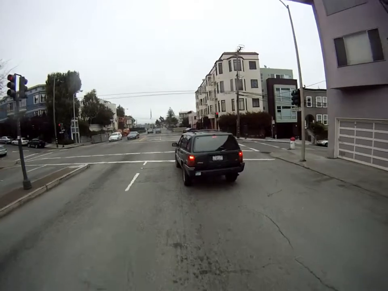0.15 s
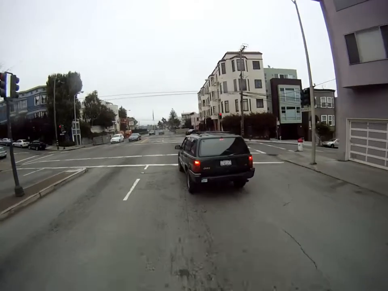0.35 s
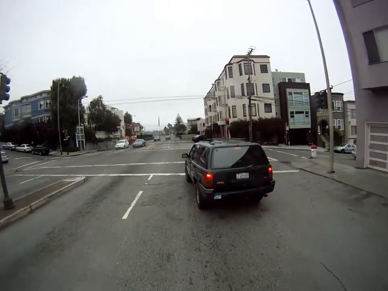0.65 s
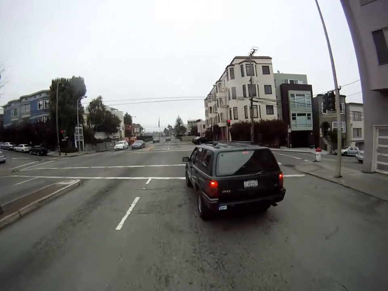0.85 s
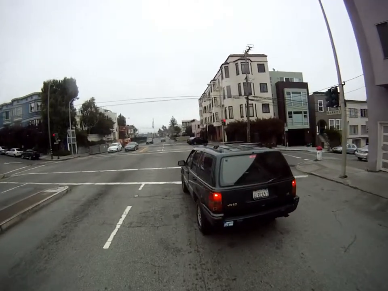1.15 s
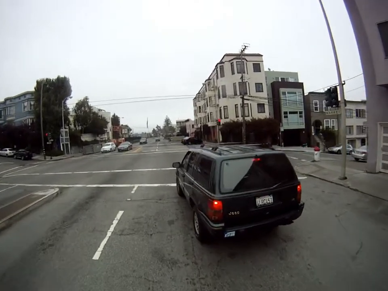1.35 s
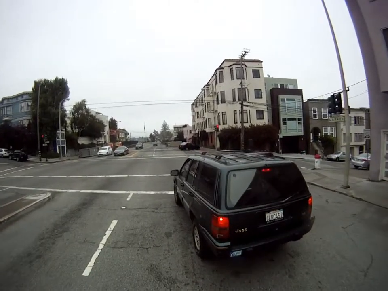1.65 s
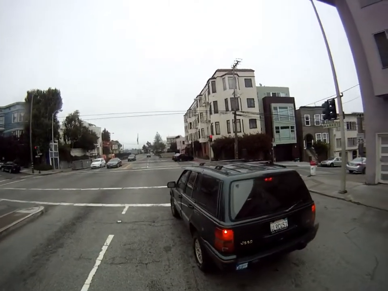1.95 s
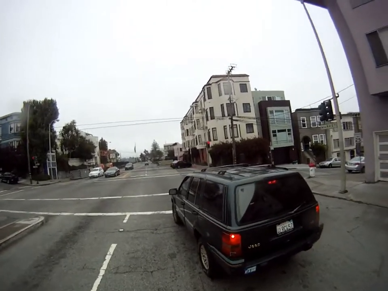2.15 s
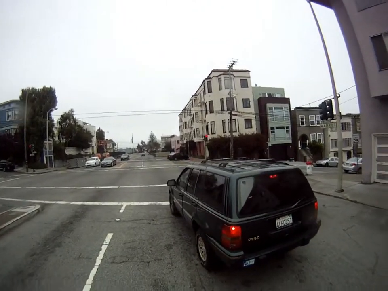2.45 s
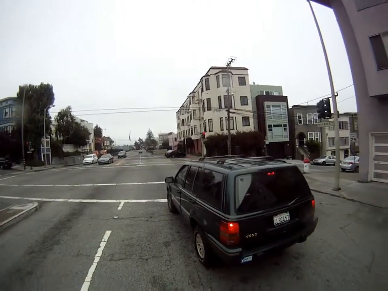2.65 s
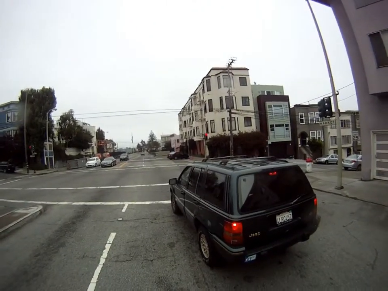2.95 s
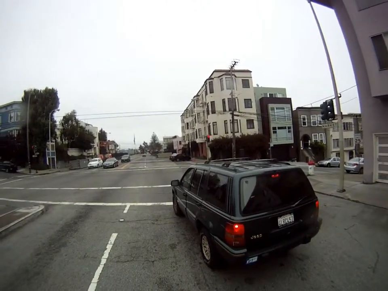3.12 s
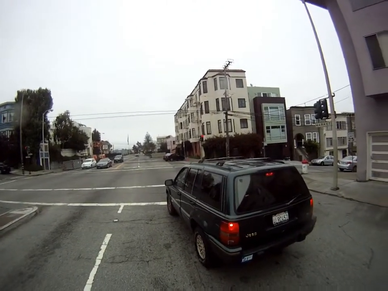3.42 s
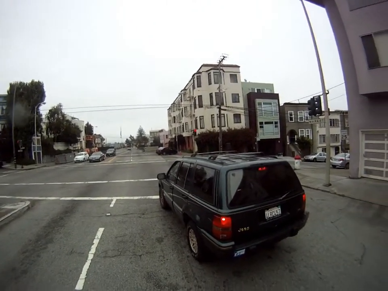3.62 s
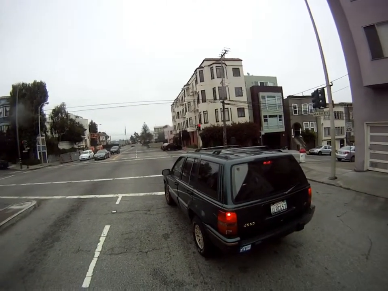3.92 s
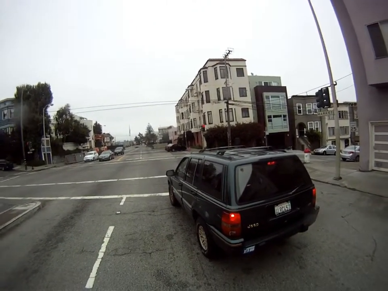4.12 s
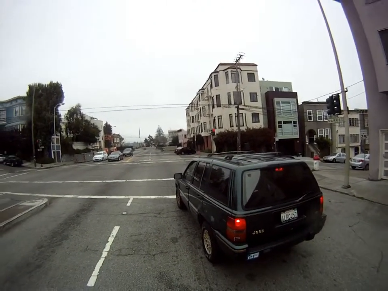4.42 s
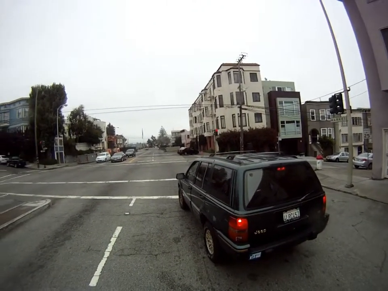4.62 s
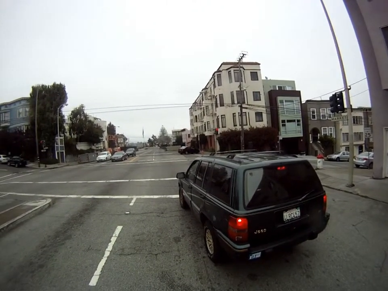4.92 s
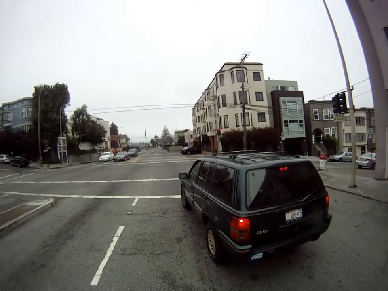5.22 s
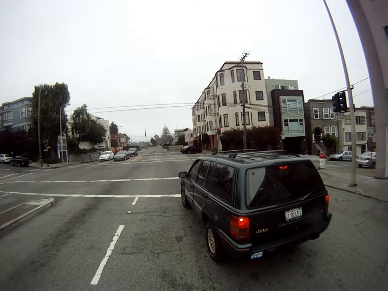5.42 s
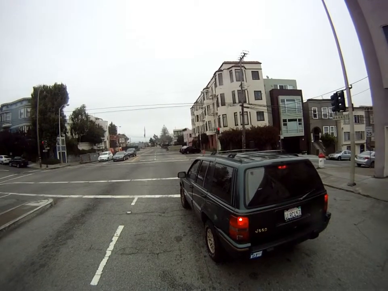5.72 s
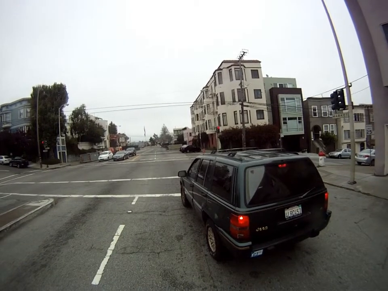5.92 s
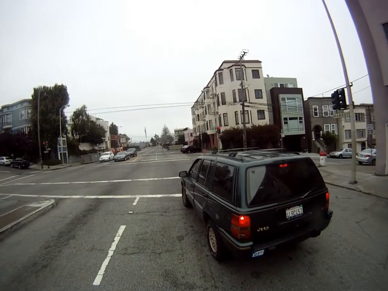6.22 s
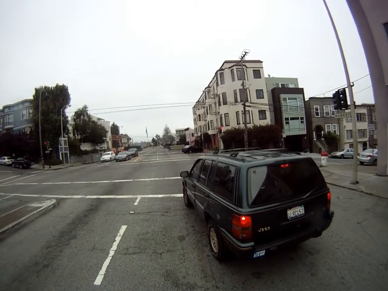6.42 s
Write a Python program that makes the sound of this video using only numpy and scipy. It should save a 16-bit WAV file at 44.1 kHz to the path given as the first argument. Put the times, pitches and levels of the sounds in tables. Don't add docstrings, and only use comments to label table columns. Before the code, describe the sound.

A bicycle brake squeals in a steady, wavering high note for under two seconds, then stops, leaving soft bumps, ticks and distant city traffic.

```python
import sys
import numpy as np
from scipy import signal
from scipy.fft import rfft, irfft, next_fast_len
from scipy.io import wavfile
from scipy.ndimage import uniform_filter1d, map_coordinates

SR = 44100
rng = np.random.default_rng(int(sys.argv[2]) if len(sys.argv) > 2 else 0)


def how_loud(loudness_db):
    steps = np.asarray(loudness_db, float) / 20
    return 10 ** steps


def wrap_up_sound(samples):
    columns = np.atleast_2d(samples).T
    tamed = np.clip(columns, -1, 1)
    steps = np.round(tamed * 32767).astype(np.int16)
    wavfile.write(sys.argv[1], SR, steps)


N = 289692
T = np.arange(N) / SR


def unit(x):
    return x / np.sqrt(np.mean(x ** 2) + 1e-20)


def along(points, hz):
    f, v = np.transpose(points)
    return np.interp(np.log(hz + 1), np.log(f + 1), v)


def swells(rows):
    return sum(size * np.exp(-((T - s) / width) ** 2) for s, size, width in rows)


def wobble(rate):
    knots = rng.standard_normal(int(N * 400 / SR) + 4)
    return map_coordinates(knots, [np.arange(N) * min(rate, 400) / SR])


def filtered(x, response):
    m = next_fast_len(N + SR // 2)
    return irfft(rfft(x, m) * response(np.fft.rfftfreq(m, 1 / SR)), m)[..., :N]


def modes(table):
    return lambda f: sum(how_loud(db) * 1j * f * w / (c * c - f * f + 1j * f * w) for c, w, db in table)


def rush(response, patchy_db):
    z = signal.stft(rng.standard_normal(N), nperseg=512)[2]
    field = uniform_filter1d(rng.standard_normal(z.shape), 6, 0)
    field = uniform_filter1d(field, 12, 1)
    noise = signal.istft(z * how_loud(patchy_db * unit(field)), nperseg=512)[1][:N]
    return unit(filtered(noise, response))


def add(track, s, sound):
    part = track[round(s * SR):][:len(sound)]
    part += sound[:len(part)]


def ring(hz, t60, attack):
    t = np.arange(SR // 4) / SR
    return np.sin(2 * np.pi * hz * t) * how_loud(-60 * t / t60) * (1 - np.exp(-t / attack))


# pitch in Hz, level in dB.
WIND_COLOUR = [(8.8, -24.5), (15, 4.5), (59, 0.5), (75, -1.5), (92, -29), (110, -17), (140, -64.5),
               (240, -120)]
# middle in seconds, rise in dB, width in seconds.
GUSTS = [(.22, 7, 0.15), (.77, 10.5, .07), (1.05, -3, 0.094), (1.37, 13.5, 0.087), (1.64, 11.5, 0.07),
         (2.03, 9, 0.19), (2.69, 3.5, 0.11), (4.03, -3, .1), (4.5, -6, 0.11), (4.85, 2.5, .05),
         (5.5, -6, 0.053), (6.0, 5, .1), (6.33, 0, .06)]


def wind():
    level_db = -64 + swells(GUSTS)
    return how_loud(level_db + 4.5 + 5.2 * wobble(14)) * rush(lambda f: how_loud(along(WIND_COLOUR, f)), patchy_db=-2.5)


# pitch in Hz, width in Hz, level in dB.
TYRES = [(1195, 110, 8.5), (1500, 190, 3)]
# middle in seconds, rise in dB, width in seconds.
CARS = [
    (.3, 8.5, 0.086),
    (.9, 3.5, 0.34),
    (1.38, 9.5, 0.19),
    (1.95, 15.5, 0.17),
    (2.45, 6.5, 0.17),
    (3.5, 9, 0.64),
    (5.8, -18, 0.66),
    (6.57, -10, .15),
]


def far_tyres():
    level_db = -69 + swells(CARS)
    return how_loud(level_db - 1 + 0.74 * wobble(9.4)) * rush(modes(TYRES), patchy_db=0.0)


# pitch in Hz, level in dB.
AIR = [(53, -18), (90, -8.5), (123, 0.5), (158, -9), (209, -10), (336, -13), (438, -15), (884, -17),
       (1190, -14), (1550, -19.5), (2090, -10.5), (2820, -22), (3540, -22), (5120, -27.5), (6000, -28),
       (7800, -73), (13200, -120)]
# pitch in Hz, width in Hz, level in dB.
CAVITY = [(2146, 49, 0)]
# middle in seconds, rise in dB, width in seconds.
TRAFFIC = [
    (0, -0.5, 0.067),
    (.5, 2.5, 0.2),
    (1.05, 2.5, .2),
    (1.7, 1.5, 0.26),
    (2.2, 1, .2),
    (3.5, 1, 0.22),
]


def city_hiss():
    level_db = -63.5 + swells(TRAFFIC)
    hiss = how_loud(level_db + 4.5 + 0.36 * wobble(4.96)) * rush(lambda f: how_loud(along(AIR, f)), patchy_db=0.65)
    port = how_loud(level_db - 6.0) * rush(modes(CAVITY), patchy_db=0.0)
    return hiss + port


# time in seconds, slip cycle in Hz, grip in dB.
SQUEAL = [
    (.205, 1592, -41),
    (.34, 1626, -39.5),
    (.5, 1597, -39),
    (.62, 1604, -39.5),
    (1.02, 1598, -36.5),
    (1.12, 1562, -33.5),
    (1.3, 1550, -32),
    (1.57, 1566, -31),
    (1.72, 1621, -34.5),
]


def grip():
    s, hz, grip_db = np.transpose(SQUEAL)
    slack_db = np.interp(T, s, grip_db) + 32
    early, late = np.maximum(s[0] - T, 0), np.maximum(T - 1.88, 0)
    return np.interp(T, s, hz), slack_db, early, late


# middle in seconds, bend in Hz, width in seconds.
SAGS = [
    (.49, -18.5, 0.026),
    (.75, -15.5, 0.018),
    (.925, 15, 0.013),
    (.95, -11, 0.0098),
    (1.04, -13.5, 0.012),
]
# snap in seconds, rise in Hz, run-up in seconds.
SKIPS = [
    (0.618, 70, 0.03),
    (0.722, 52, 0.0222),
    (0.815, 73, .02),
    (0.866, 25.1, .012),
]


def slip_phase(held_hz, slack_db, early, late):
    pitch = held_hz + 2000 * early + 42 * np.clip(late / .02, 0, 1) + swells(SAGS)
    for s, hz, run in SKIPS:
        pitch += hz * np.exp(np.minimum(T - s, 0) / run) * (T < s)
    pitch = uniform_filter1d(pitch, size=300)
    judder = np.sin(2 * np.pi * np.cumsum(44 + 7 * wobble(11)) / SR)
    warble_hz = 3.6 - 0.9 * slack_db
    return 2 * np.pi * np.cumsum(pitch + warble_hz * judder + 3 * wobble(59.42)) / SR


# level in dB at full grip, dB gained per dB of grip,
# steepness of the bite, steepness of the release (both as multiples).
HARMONICS = [
    (-33, 0.99, 1.5, 0.99),
    (-32.5, 1.5, 4.2, 1.1),
    (-51, 0.33, 2.6, 0.7),
]
# middle in seconds, change in dB, width in seconds.
FIRST_SWELLS = [(.44, 1.5, .015), (.48, -4.5, 0.029), (0.716, -15.5, 0.013), (.76, 5.5, 0.034),
                (.834, -7, 0.012), (.96, 4.5, 0.071), (1.345, -10, .04), (1.434, 4.5, 0.022),
                (1.75, -12, 0.016), (1.8, 3.5, 0.013), (1.835, -5, 0.016), (1.866, 4, .015)]
SECOND_SWELLS = [(.212, 6.5, 0.014), (.35, -11.5, 0.058), (0.457, 5.5, 0.044), (0.749, 5, .01),
                 (.77, -11, 0.0081), (.834, 3, 0.026), (.93, -6, 0.015), (.96, 5.5, 0.014),
                 (1.232, -8, .015), (1.284, 3, 0.024), (1.316, -6, 0.009), (1.356, 6.5, 0.02),
                 (1.67, 6.5, 0.065), (1.8, 2, .04), (1.9, -12, 0.037), (1.95, -4.5, 0.08)]
THIRD_SWELLS = [(0.331, 6, .12), (.486, -13, 0.02), (0.54, 9, 0.031), (.62, -8, .05), (.782, 4.5, 0.025),
                (.808, -1, 0.0092), (1.036, -6, 0.02), (1.15, -5, 0.09), (1.336, -8.5, 0.013),
                (1.5, -3.5, .015), (1.538, 7.5, 0.014), (1.71, 9, 0.037), (1.8, -7, 0.14)]


def squeal_note(held_hz, slack_db, early, late):
    phase = slip_phase(held_hz, slack_db, early, late)
    note, levels = np.zeros(N), []
    for (db, grows, bite, release), rows in zip(HARMONICS, (FIRST_SWELLS, SECOND_SWELLS, THIRD_SWELLS)):
        fades_db = bite * 255.5 * early + release * 147.5 * late
        levels.append(db + grows * slack_db - fades_db + swells(rows))
        note += how_loud(levels[-1] + 0.88 * wobble(45.27)) * np.sqrt(2) * np.sin(len(levels) * phase)
    return note + how_loud(levels[1] - 16.5) * np.sin(4 * phase)


# pitch in Hz, width in Hz, level in dB.
ARMS = [(2200, 190, -3), (2360, 74, -5.5), (2420, 95, -7), (2740, 430, -7.5), (3520, 210, -5),
        (4960, 430, -8)]
# middle in seconds, rise in dB, width in seconds.
GRABS = [
    (.555, 12, 0.013),
    (1.368, 11.5, 0.039),
    (1.43, 8.5, .045),
    (1.65, 9, .02),
    (1.83, 10, 0.045),
]


def arm_chatter(slack_db):
    chatter = unit(how_loud(2.5 * wobble(70)) * rush(lambda f: modes(ARMS)(f) ** 2, patchy_db=2))
    low = filtered(chatter, lambda f: 1 / (1 + (f / 2900) ** 8))
    grab_db = swells(GRABS)
    shaken = how_loud(grab_db) * low + how_loud(0.67 * grab_db) * (chatter - low)
    return how_loud(-61.5 + 1.1 * slack_db) * shaken


def brake():
    held_hz, slack_db, early, late = grip()
    touch = np.clip((T - .14) / 0.012, 0, 1) * np.clip((2.0 - T) / 0.02, 0, 1)
    return touch * (squeal_note(held_hz, slack_db, early, late) + arm_chatter(slack_db))


# delay in seconds, level in dB.
WALLS = [
    (.028, -19.5),
    (.062, -14.5),
    (.125, -24),
]
# pitch in Hz, time to fade by 60 dB in seconds.
FRONTS = [(1500, 0.93), (3200, 1.03), (5000, 0.63)]


def house_fronts(x):
    hz, t, z = signal.stft(rng.standard_normal(int(1.2 * SR)), SR, nperseg=256)
    fade = how_loud(-60 * t / along(FRONTS, hz)[:, None])
    tail = signal.istft(z * fade, SR, nperseg=256)[1]
    far = signal.fftconvolve(np.pad(x, (int(0.022 * SR), 0)), tail / np.linalg.norm(tail))[:N]
    walls = np.zeros(N)
    for s, db in WALLS:
        walls += how_loud(db + 1.7 * wobble(18)) * np.pad(x, (int(s * SR), 0))[:N]
    return how_loud(-8.0) * far * unit(1.2 + .5 * wobble(40.02)) + walls


# start in seconds, peak in dB, pitch in Hz, rattle in dB,
# time to fade by 60 dB in seconds.
BUMPS = [(0.452, -35.5, 54.7, -5.5, 0.15), (0.698, -41.5, 37.3, -33, 0.14), (1.032, -43.5, 69, -6.5, 0.16),
         (1.045, -37, 51.6, -31, 0.23), (1.378, -45.5, 42.2, -32, 0.18), (1.632, -33.5, 44.6, -6.5, 0.17),
         (3.078, -39, 58.5, -16, 0.15), (3.779, -44.5, 45, -17, 0.17), (4.682, -43, 42, -12.5, 0.14),
         (5.301, -49.5, 44.7, -18, 0.089), (5.667, -49, 43.6, -27, 0.11), (6.356, -36, 56.5, -24, 0.15)]


def bumps():
    track = np.zeros(N)
    for s, db, hz, rattle_db, t60 in BUMPS:
        add(track, s, -how_loud(db + 7.5) * ring(hz, t60, attack=0.0055))
        add(track, s - .004, how_loud(db + rattle_db + 12.0) * ring(169.6, 0.043, attack=0.0027))
    return track


# start in seconds, peak in dB, pitch in Hz,
# time to fade by 60 dB in seconds, level of the upper modes in dB.
LET_GO = [(0.576, -36.5, 1667, 0.19, -26), (0.811, -38, 1698, 0.11, -25), (0.874, -37, 1697, .08, -31),
          (0.929, -46.5, 1640, 0.076, -27), (.697, -51.5, 2470, 0.053, -40), (.765, -50, 2420, 0.062, -40),
          (.862, -53.5, 2455, 0.064, -43), (1.345, -47.5, 2200, .1, -32), (1.352, -44.5, 2510, .1, -32),
          (1.41, -52, 2250, .07, -31), (1.532, -48, 2300, 0.031, -43.5), (1.561, -42, 2360, 0.086, -42),
          (1.886, -26, 1730, 0.048, -11.5), (1.939, -44, 1795, 0.043, -1)]


def rim_rings():
    track = np.zeros(N)
    for s, db, hz, t60, upper_db in LET_GO:
        upper = ring(1.09 * hz, t60, attack=0.0035) + 0.23 * ring(2 * hz, t60, attack=0.0022)
        add(track, s, how_loud(db + 11.0) * (ring(hz, t60, attack=0.1 * t60) + how_loud(upper_db) * upper))
    return track


# start in seconds, peak in dB, pitch in Hz,
# time to fade by 60 dB in seconds, crack in dB.
TICKS = [
    (2.45, -47, 2220, 0.067, -21),
    (2.535, -48, 2200, 0.032, 3.5),
    (2.583, -42.5, 2020, .022, 6.5),
    (2.838, -54.5, 3220, 0.031, -20),
    (3.038, -45, 1090, .018, -18),
    (4.18, -51.5, 2200, 0.047, -10),
]


def ticks():
    track, t = np.zeros(N), np.arange(SR // 4) / SR
    for s, db, hz, t60, crack_db in TICKS:
        grit = rng.standard_normal((2, len(t)))
        crack = uniform_filter1d(np.diff(grit[0], prepend=0), size=5) * 1.1
        add(track, s, how_loud(db + crack_db - 60 * t / t60) * crack)
        scrape = 1 + 6.2 * uniform_filter1d(grit[1], size=40)
        add(track, s, how_loud(db + 8.5) * ring(hz, t60, attack=0.19 * t60) * scrape)
    return track


# middle in seconds, change in dB, width in seconds.
NULLS = [(.27, -3, .005), (0.299, -15, 0.0025), (.322, 0, 0.0033), (.343, -8, 0.0044), (.41, -7, .006),
         (0.641, -16, 0.0036), (0.719, -6.5, 0.0046), (.8, -8.5, .004), (1.378, -2.5, .008),
         (1.63, -5, 0.0028), (1.65, -4.5, 0.0051), (1.69, -6, 0.0044), (1.71, -4.5, 0.0037),
         (1.731, -11, 0.0052), (1.764, -14, 0.0063), (1.822, -6.5, 0.0055)]


def scene():
    street = wind() + far_tyres() + city_hiss()
    squeal = brake() + rim_rings()
    heard = how_loud(swells(NULLS)) * (how_loud(0.5) * squeal + house_fronts(squeal))
    return (heard + bumps() + ticks() + street)[None]


def band_limit(x):
    return signal.sosfilt(signal.butter(12, 15520, fs=SR, output="sos"), x)


def record(dry):
    hold_hz, repeats = 12000, 4
    slow = filtered(dry, lambda f: 1 / (1 + (f / 5750) ** 40))
    comb = 1 + 2 * np.cos(2 * np.pi * hold_hz * T)
    held = filtered(slow * comb, lambda f: (f < 15340) * np.sinc(f / hold_hz) / np.sinc(f / hold_hz / repeats))
    return band_limit(held)


dry = scene()
out = record(dry)
wrap_up_sound(out)
```